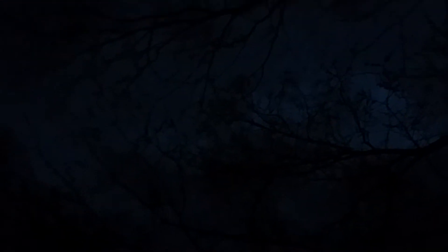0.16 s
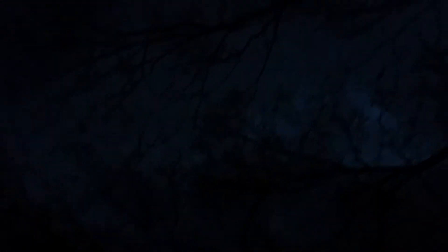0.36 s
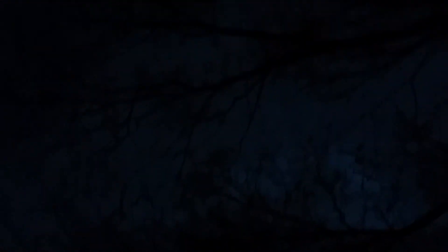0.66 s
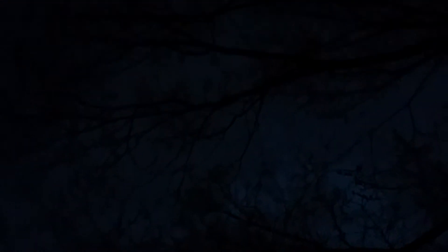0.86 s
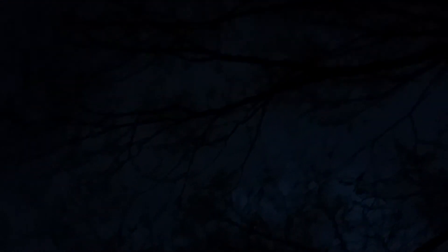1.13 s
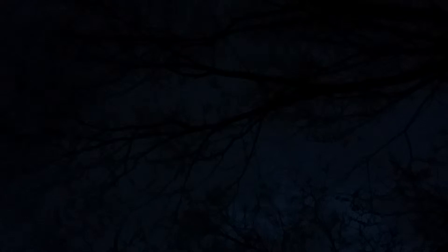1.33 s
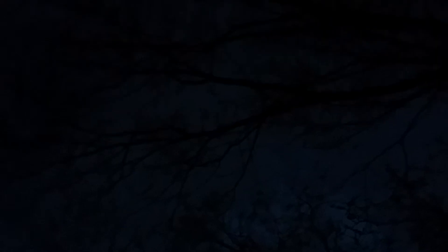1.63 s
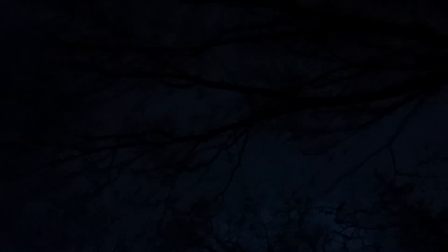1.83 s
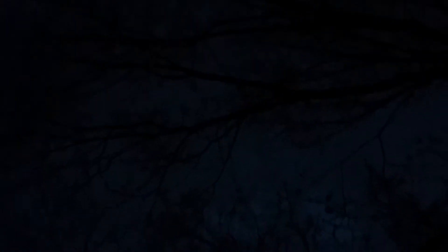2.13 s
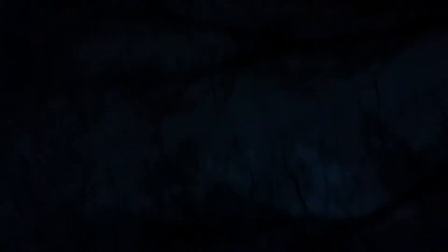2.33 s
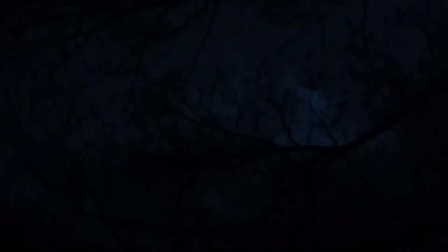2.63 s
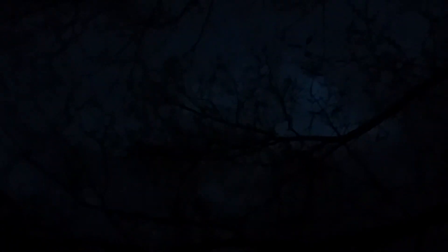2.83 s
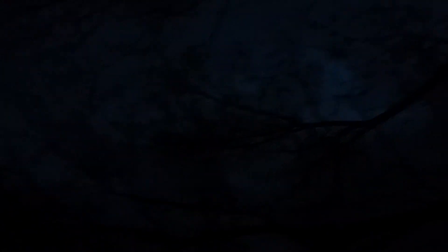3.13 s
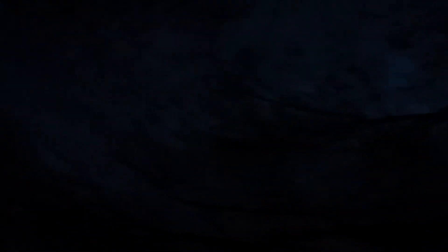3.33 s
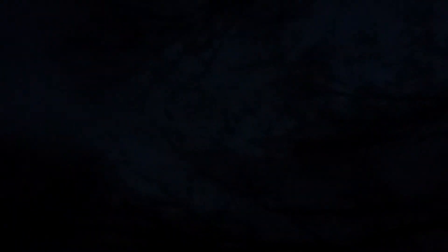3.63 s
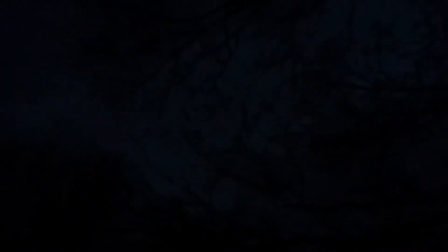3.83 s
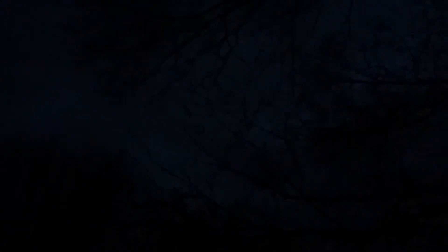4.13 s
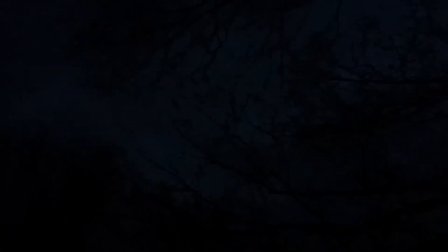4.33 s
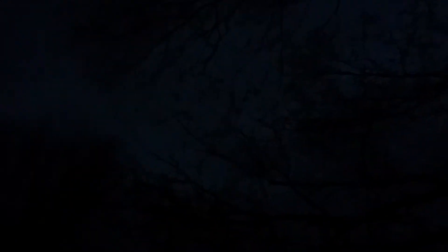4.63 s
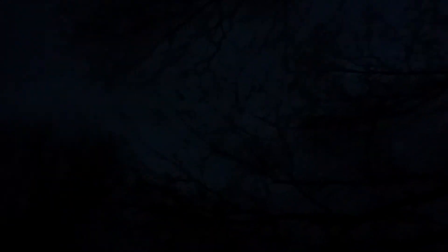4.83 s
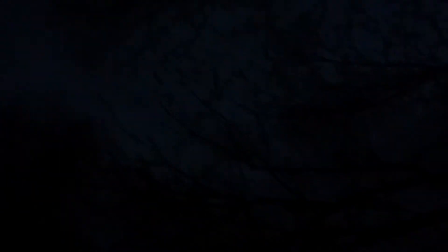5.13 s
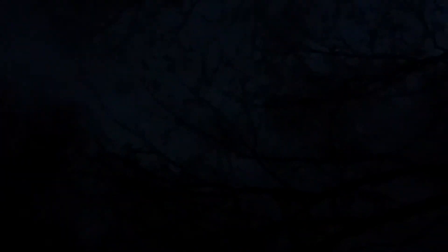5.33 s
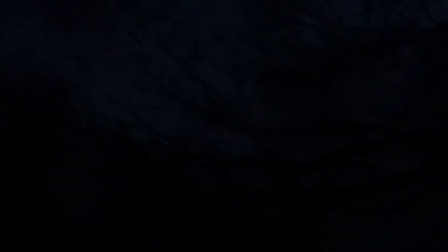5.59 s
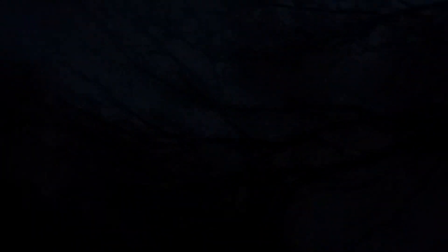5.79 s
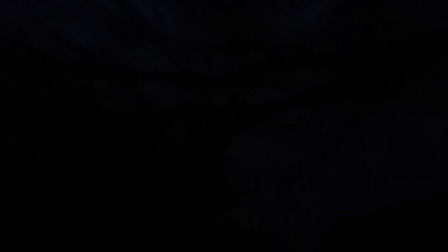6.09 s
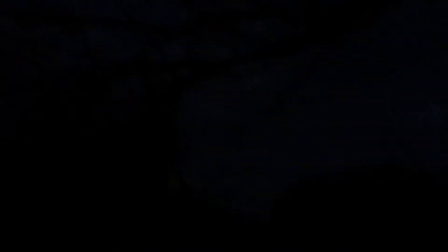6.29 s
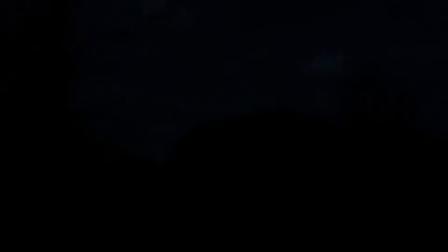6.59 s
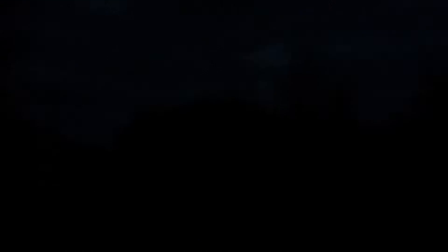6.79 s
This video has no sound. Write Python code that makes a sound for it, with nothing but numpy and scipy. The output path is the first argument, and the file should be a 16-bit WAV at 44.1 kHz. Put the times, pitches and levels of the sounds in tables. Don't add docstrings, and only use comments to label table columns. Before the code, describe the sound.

Hundreds of small frogs at a pond in bare woods at dusk fill the air with short, rising, near-pure whistles. Nearer peeps stand out of a blurred far chorus, mostly left. A slower frog gives dry ticks in runs, with soft clucks. Distant traffic rumbles faintly with a wavering engine hum. In the last two seconds, fingers click, knock and rub the hand-held stereo recorder as it turns.

```python
import sys
import numpy as np
from scipy import signal
from scipy.io import wavfile
from scipy.ndimage import uniform_filter1d

SR = 44100
rng = np.random.default_rng(int(sys.argv[2]) if len(sys.argv) > 2 else 0)


def store_wav(level_fs):
    pcm = np.round(np.clip(np.atleast_2d(level_fs), -1, 1) * 32767)
    wavfile.write(sys.argv[1], SR, pcm.T.astype(np.int16))


def natural_amplitude(level_db):
    exponent = np.asarray(level_db, float) / 20
    return 10 ** exponent


N = 306495

# (frequency [Hz], density [dB])
AIR_COLOUR = [(120, 9), (250, -4.5), (700, 1.5), (1300, 1), (2200, -5), (3700, -18.5), (4300, -12.5),
              (5200, -16.5), (6700, -13), (8500, -16), (10200, -17.5), (11500, -14), (13000, -19),
              (15300, -17)]
# (time [s], level [dB])
WASH_LEVEL = [
    (0.0, -51.5),
    (3.25, -51.5),
    (4.14, -54),
    (6.37, -52),
    (6.95, -52),
]
# (frequency [Hz], left-right likeness [-1 to 1])
STEREO_LIKENESS = [(60, 0.98), (150, 0.89), (380, 0.57), (620, 0.61), (1100, -0.46), (2380, 0.037),
                   (5980, -0.031), (15000, -0.013)]
# (frequency [Hz], left minus right [dB])
STEREO_LEAN = [(60, 0.5), (150, 0), (380, -0.5), (950, 2), (2380, 3.5), (5980, 9), (15000, 4)]
# (time [s], note [Hz], level [dB])
ENGINE = [
    (0.0, 136, -66),
    (.6, 140, -60),
    (1.12, 148, -49),
    (1.6, 140.4, -47),
    (2.24, 129, -66.5),
    (3.89, 140, -56),
    (6.2, 127, -60.5),
    (6.85, 128, -51),
    (6.95, 126, -76),
]
# (frequency [Hz], density [dB])
ROAR_COLOUR = [(18, -30), (30, -30), (44, -38), (66, 13.5), (107, 5.5), (141, 3.5), (153, -9), (172, 2),
               (260, -6.5), (340, -7.5), (570, -120)]
# (start [s], end [s], pitch [Hz], level [dB])
MACHINE_WHINE = (5.05, 5.75, 510, -66.5)
# (time [s], peak [dB], ring [Hz], left minus right [dB])
NAIL_CLICKS = [(0.179, -35, 8700, -3), (0.9254, -40, 11800, 11), (2.3281, -42, 8600, -7),
               (2.3764, -41, 8550, 1), (2.4644, -37.5, 8240, 1), (2.6477, -38, 6780, 6),
               (4.989, -38.5, 8600, -23.5), (5.0962, -41, 8280, -0.5), (5.218, -38, 8900, -11),
               (5.232, -40.5, 7860, -23), (5.362, -39.5, 6190, 3), (5.434, -36.5, 8900, -3),
               (5.469, -38, 8140, -6), (5.4879, -39, 7110, 0), (5.4984, -39, 9060, -10),
               (5.5212, -37, 8100, 2.5), (5.6045, -40, 6820, 17), (5.744, -47, 6960, -4),
               (5.7961, -24.5, 6960, 22), (5.808, -31.5, 8800, -14.5), (6.085, -40, 11200, -1),
               (6.229, -40, 6300, -7), (6.4613, -33, 7960, 1), (6.677, -33.5, 6580, 11),
               (6.718, -38, 7940, -16), (6.7366, -42, 6700, -3), (6.88, -43, 7350, -11.5)]
# (time [s], peak [dB], ring [Hz], left minus right [dB])
CASE_KNOCKS = [
    (5.452, -35.5, 470, -5.5),
    (5.497, -38, 305, -11.5),
    (5.522, -39, 1290, -8),
    (5.607, -43, 265, -19),
    (5.797, -30.5, 437, -11),
    (5.89, -40.5, 408, 9),
    (6.462, -38, 1530, 13.5),
    (6.679, -40, 556, 11.5),
    (6.83, -40.5, 226, -2),
    (6.87, -33.5, 716, -14.5),
]
# (middle [s], length [s], level [dB])
SKIN_STROKES = [
    (5.258, .1, -57),
    (5.774, 0.079, -47),
    (5.86, .14, -59),
    (6.057, 0.2, -58),
    (6.486, 0.18, -56),
    (6.66, 0.56, -62),
    (6.88, 0.14, -58),
]
# (time [s], peak [dB])
SINGLE_TICKS = [(.0488, -36), (.1067, -42), (.2314, -46), (.7512, -51), (2.0004, -49), (2.9572, -44),
                (3.0255, -45), (3.0644, -38), (3.6686, -45), (4.1924, -46), (4.7326, -49), (4.8968, -46)]
# (first tick [s], last tick [s], ticks [count], peak [dB], slowing [share of the run,
# negative quickens])
TICK_RUNS = [
    (.9178, 1.3987, 6, -40, .01),
    (1.5743, 1.8292, 3, -40.5, .08),
    (2.0517, 2.4359, 4, -46.5, -.12),
    (3.1208, 3.6112, 6, -39, 0),
    (3.7978, 4.1555, 5, -40.5, 0),
    (5.0604, 5.609, 6, -38, .11),
]
# (time [s], peak [dB], pitch [Hz])
LOW_CLUCKS = [
    (1.6217, -53, 1430),
    (1.782, -47.5, 1230),
    (1.909, -49, 1374),
    (2.0647, -59, 1383),
    (2.231, -54, 1276),
    (5.51, -50, 1064),
    (6.75, -52, 1334),
    (6.82, -51, 1315),
    (6.9, -51, 1350),
]
# (time [s], level [dB])
CHORUS_LEVEL = [(0.0, -29.5), (.07, -38.5), (.4, -39.5), (1.57, -39), (1.95, -36.5), (2.4, -39),
                (3.12, -39), (4.08, -38.5), (4.68, -39), (5.46, -38.5), (5.7, -41), (6.95, -40)]
# (middle pitch [Hz], level [dB])
CROWD_VOICES = [(2400, -30), (2520, -12), (2650, -2.5), (2800, 0), (2950, -2.5), (3100, -11), (3200, -18)]
# (ring [Hz], level [dB])
FAR_TICKERS = [(2860, -7), (3000, -5), (3090, -3), (3170, -2), (3260, -3), (3340, -5), (3420, -10),
               (3500, -14)]
# (start [Hz], end [Hz], length [s], lag at the left microphone [samples], upper partial [dB])
NEAR_VOICES = [(2420, 2865, .24, 15, -42), (2760, 3220, .185, 10, -36), (2570, 3030, .225, 8, -39),
               (2465, 2980, .2, 15, -38), (2640, 3070, .165, 8, -33), (2585, 3015, .185, 16, -38),
               (2720, 2985, .14, 17, -35), (2345, 2490, .08, 14, -39), (2650, 3150, .18, 15, -38),
               (2465, 2940, .2, 8, -40), (2710, 2990, .12, 10, -34), (2735, 3140, .15, 2, -40)]
# (time [s], level [dB])
NEAR_CALLS = [
    [(.942, -35), (2.24, -34), (3.99, -33.5), (5.255, -33.5), (6.59, -37)],
    [(.575, -38), (1.725, -35.5), (2.945, -34.5), (4.118, -37), (5.22, -37), (6.56, -37.5)],
    [(.1, -36), (1.428, -41), (2.659, -33.5), (3.856, -37.5)],
    [(1.18, -40), (2.485, -36.5), (3.69, -38.5)],
    [(.682, -44), (2.02, -33), (4.35, -36), (4.97, -43.5), (5.49, -39)],
    [(.586, -36.5), (2.251, -39), (4.714, -38), (6.143, -47)],
    [(1.813, -46.5), (4.555, -37), (6.001, -40), (6.186, -43)],
    [(.045, -48), (1.2, -48.5), (1.625, -44), (2.66, -51), (2.868, -48), (4.085, -46), (4.145, -47),
     (4.95, -53), (5.478, -48), (6.455, -51), (6.89, -42)],
    [(3.012, -38), (3.276, -45)],
    [(4.915, -41)],
    [(.495, -35.5), (2.06, -47)],
    [(6.867, -36.5)],
]
# (time [s], length [s], start [Hz], level [dB], left lag [samples])
HIDDEN_CALLS = [(.01, .14, 2850, -46, 20), (.065, .08, 2670, -46, 19), (.289, .08, 2750, -47, 25),
                (.38, .11, 2510, -47, 17), (.514, .08, 2620, -44, 14), (.79, .06, 2960, -47, 17),
                (.828, .22, 2550, -43, 26), (.843, .22, 2680, -45, 17), (1.207, .18, 2480, -46, 23),
                (1.71, .12, 2520, -43, 14), (1.881, .11, 2690, -45, 14), (2.0, .09, 2540, -46, 13),
                (2.03, .18, 2560, -47, 15), (2.305, .11, 2870, -47, 13), (2.38, .11, 2560, -46, 15),
                (2.739, .14, 2630, -46, 12), (2.744, .08, 2500, -49, 14), (3.053, .14, 2650, -45, 25),
                (3.278, .08, 2880, -47, 24), (3.288, .18, 3000, -53, 23), (3.3, .2, 2490, -41, 16),
                (3.39, .2, 2450, -45, 20)]
# (time [s], length [s], start [Hz], level [dB], left lag [samples])
LATE_HIDDEN_CALLS = [(3.472, .08, 2720, -45, 23), (3.761, .18, 2540, -46, 21), (4.081, .08, 2810, -45, 24),
                     (4.161, .22, 2620, -44, 14), (4.435, .18, 2630, -45, 22), (4.46, .08, 2820, -44, 15),
                     (4.739, .18, 2570, -44, 23), (5.059, .11, 2960, -46, 23), (5.258, .14, 2700, -45, 20),
                     (5.515, .17, 2520, -41.5, 21), (5.652, .08, 2880, -47, 23),
                     (5.677, .18, 2520, -48, 21), (5.767, .08, 2480, -51, 23), (5.877, .08, 2670, -47, 23),
                     (6.03, .16, 2470, -44, 18), (6.161, .08, 2760, -43, 23), (6.28, .17, 2420, -50, 18),
                     (6.371, .08, 2790, -50, 22), (6.455, .08, 2810, -49, 11), (6.725, .11, 2490, -51, 21),
                     (6.775, .11, 2470, -51, 20)]
# (time [s], left minus right for the pond [dB], added left lag [samples])
HAND_TURN = [
    (0.0, 6.0, 0),
    (2.59, 4.5, -1),
    (2.77, 7.5, -1),
    (3.15, 7.3, -1),
    (3.28, 7.2, 7),
    (5.6, 5.8, 7),
    (5.96, 5.5, 5),
    (6.23, .3, 8),
    (6.55, 2.0, 11),
    (6.95, 4.0, 15),
]
# (frequency [Hz], margin [dB])
FAINT_MARGIN = [(1900, -12), (2250, -6), (2500, -40), (3300, -40), (3650, -1.5), (5300, -2.2), (6200, -6),
                (10200, -3.5), (11500, -5), (13000, -3), (14900, -3), (15500, 0)]


def evened(x):
    return x / np.sqrt(np.mean(x ** 2) + 1e-20)


def read(points, hz):
    f, value = np.transpose(points)
    return np.interp(np.log(hz + 1), np.log(f + 1), value)


def follow(rows):
    s, *columns = np.transpose(rows)
    return [np.interp(np.arange(N) / SR, s, column) for column in columns]


def add(mix, s, sound, pan_db, lag=0):
    for side, (sign, late) in enumerate(((1.0, lag), (-0.97, 0))):
        start = max(round(s * SR) + round(late), 0)
        part = mix[side, start:][:len(sound)]
        part += natural_amplitude(sign * pan_db / 2) * sound[:len(part)]


def noise(shape_db, patch_db):
    hz = np.fft.rfftfreq(2048, 1 / SR)
    a, b, c, d, patch = rng.standard_normal((N // 512 + 5, 1025, 5)).T
    patch = uniform_filter1d(patch, size=20, axis=0)
    patch = evened(uniform_filter1d(patch, size=6, axis=1))
    same = np.clip(read(STEREO_LIKENESS, hz), -1, 1)[:, None]
    lean = natural_amplitude(read(STEREO_LEAN, hz) / 2)[:, None]
    shared, own = a + 1j * b, c + 1j * d
    z = np.array([shared * lean, (same * shared + np.sqrt(1 - same ** 2) * own) / lean])
    z *= natural_amplitude(shape_db(hz)[:, None] + patch_db * patch)
    return evened(signal.istft(z, nperseg=2048, noverlap=1536)[1][:, :N])


def woods(x, t60):
    taps = rng.choice([-1., 1.], (2, 16000)) * (rng.random((2, 16000)) < .05)
    taps *= natural_amplitude(-60 * np.arange(16000) / SR / t60)
    return signal.oaconvolve(x, taps / np.linalg.norm(taps[0]), axes=1)[:, :N]


def ring(hz, t60, rise):
    t = np.arange(0, t60, 1 / SR)
    y = np.sin(2 * np.pi * hz * t) * natural_amplitude(-60 * t / t60) * (1 - np.exp(-t / rise))
    return y / abs(y).max()


def peep(length, start_hz, end_hz, wobble, upper_db):
    u = np.arange(0, length, 1 / SR) / length
    hz = start_hz + (end_hz - start_hz) * (1.3 * u - .3 * u ** 2 - .1 * u ** 6)
    phase = 2 * np.pi * np.cumsum(hz) / SR
    flutter = np.interp(u, np.linspace(0, 1, len(wobble)), wobble)
    growth = 3.2 if length > .23 else 0.3
    swell = (0.84 + growth * u) * np.clip(np.minimum(u / 0.098, (1 - u) / 0.22), 0, 1)
    upper = natural_amplitude(upper_db + 2.0 * flutter[::-1]) * np.sin(phase * 3 / 2)
    return evened(swell * natural_amplitude(1.5 * flutter)) * np.sqrt(2) * (np.sin(phase) + upper)


def air():
    hiss_db = -63
    wash_db = follow(WASH_LEVEL)[0]
    wash = noise(lambda f: read(AIR_COLOUR, f) - 60 * (f > 3000) - 60 * (f < 90), .8)
    hiss = noise(lambda f: read(AIR_COLOUR, f) - 60 * (f <= 3000) - 40 * (f > 15600), 1.5)
    return natural_amplitude(wash_db + 3.0) * wash + natural_amplitude(hiss_db + 5.0) * hiss


def traffic():
    roar_db, roar_share = -53.5, 0.098
    hz, note_db = follow(ENGINE)
    note = np.sqrt(2) * natural_amplitude(note_db - 4.0) * np.sin(2 * np.pi * np.cumsum(hz) / SR)
    roar = noise(lambda f: read(ROAR_COLOUR, f), 0.94)
    return natural_amplitude(roar_db + roar_share * (note_db - note_db.mean())) * roar + note


def whine():
    start, end, hz, db = MACHINE_WHINE
    t = np.arange(N) / SR
    fade = np.clip(np.minimum(t - start, end - t) / 0.046, 0, 1)
    pulse_db = 2.5 * np.cos(2 * np.pi * (t - start - .05) / .55)
    return np.sqrt(2) * natural_amplitude(db + pulse_db) * fade * np.sin(2 * np.pi * hz * t)


def nail_clicks():
    out, t = np.zeros((2, N)), np.arange(220) / SR
    grit = signal.lfilter([1, 0, -1], 1, rng.standard_normal((2, len(NAIL_CLICKS), 220))) / 3
    burst = (t / 0.00069) ** 2 * np.exp(2 - 2 * t / 0.00053)
    for (s, db, hz, pan_db), first, second in zip(NAIL_CLICKS, *grit):
        ringing = 0.71 * np.sin(2 * np.pi * hz * t)
        add(out, s, natural_amplitude(db) * burst * (first + ringing), pan_db - 5.5, lag=8.6)
        add(out, s + 0.00056, natural_amplitude(db - 8.0) * burst * second, pan_db - 28.0, lag=-17.5)
    return out


def case_knocks():
    out = np.zeros((2, N))
    # (ratio to the ring, level [dB], decay to -60 dB [s])
    modes = ((.6, -23, 0.034), (1, 2, 0.023), (1.45, 1, 0.014),
             (2.2, -3.5, 0.011), (2.75, -12, 0.0073), (3.3, -14.5, 0.042))
    for s, db, hz, pan_db in CASE_KNOCKS:
        for ratio, mode_db, t60 in modes:
            mode = ring(ratio * hz, t60 * min(1, 500 / hz) ** 2.1, 0.3 / hz)
            add(out, s, -natural_amplitude(db + mode_db) * mode, pan_db, lag=35.5)
    return out


def skin_rub():
    t, strokes = np.arange(N) / SR, np.zeros(N)
    for s, length, db in SKIN_STROKES:
        strokes += natural_amplitude(db) * np.clip(1 - abs(t - s) / length * 2, 0, 1)
    rub = noise(lambda f: -18 * abs(np.log2(f / 8200 + 1e-9)), 3.0)
    return strokes * natural_amplitude(np.array([[-5], [1.5]])) * rub


def other_frogs():
    out, ticks = np.zeros((2, N)), list(SINGLE_TICKS)
    for first, last, count, db, slowing in TICK_RUNS:
        u = np.arange(count) / (count - 1)
        times = first + (last - first) * (u + slowing * (u * u - u))
        ticks += zip(times, db - 8 * abs(u - 0.9))
    for s, db in ticks:
        throat = ring(3390, .016, .0016) + .7 * ring(3190, .016, .0016)
        add(out, s, natural_amplitude(db - 1.0) * throat, 11.5, lag=15)
    for s, db, hz in LOW_CLUCKS:
        add(out, s, natural_amplitude(db) * ring(hz, 0.085, 0.0087), 3.0, lag=4.03)
    return out + natural_amplitude(-9) * woods(out, .3)


def far_tickers():
    beats = rng.random((len(FAR_TICKERS), N)) < 70 / SR
    beats = beats * natural_amplitude(5.0 * rng.standard_normal(N))
    rattle = np.zeros(N)
    for beat, (hz, db) in zip(beats, FAR_TICKERS):
        rattle += signal.oaconvolve(beat, natural_amplitude(db) * ring(hz, .011, .0012))[:N]
    return evened(np.array([rattle, .7 * np.roll(rattle, -19)]))


def far_frogs(count=680):
    out = np.zeros((2, N))
    draw, chance = rng.random((count, 4)), rng.standard_normal((count, 12))
    for k, ((when, pitch, size, climb), c) in enumerate(zip(draw, chance)):
        hz, length = 2400 + 800 * pitch, .1 + .09 * size
        half_climb = length * (800 + 500 * climb)
        whistle = peep(length, hz - half_climb, hz + half_climb, c[3:], -31.5)
        level = natural_amplitude(read(CROWD_VOICES, hz) + 0.43 * c[0])
        s = (k + 8 * when) / count * N / SR - .15
        add(out, s, level * whistle, 3.0 * c[1], lag=20 + 8 * c[2])
    mass = evened(out) + natural_amplitude(-11.5) * far_tickers()
    heard = evened(mass + natural_amplitude(6.5) * woods(mass, .6))
    return natural_amplitude(follow(CHORUS_LEVEL)[0] - 1.04) * heard


def near_frogs():
    climb = 2100
    turn_lag = follow(HAND_TURN)[1]
    rows = []
    for (start_hz, end_hz, length, lag, upper_db), calls in zip(NEAR_VOICES, NEAR_CALLS):
        for s, db in calls:
            rows.append((s, length, start_hz, end_hz, db, lag + turn_lag[round(s * SR)], upper_db))
    for s, length, hz, db, lag in list(HIDDEN_CALLS) + list(LATE_HIDDEN_CALLS):
        rows.append((s, length, hz, hz + climb * length, db, lag, -41))
    out, chance = np.zeros((2, N)), rng.standard_normal((len(rows), 14))
    for (s, length, start_hz, end_hz, db, lag, upper_db), c in zip(rows, chance):
        whistle = peep(length, start_hz, end_hz, c[1:], upper_db + 1.5 * c[0])
        add(out, s, natural_amplitude(db - 1.2) * whistle, 0, lag)
    return out + natural_amplitude(-10) * woods(out, .5)


def scene():
    background = air() + traffic() + whine()
    handling = nail_clicks() + case_knocks() + skin_rub()
    turn_db = follow(HAND_TURN)[0] - .6
    pond = (far_frogs() + near_frogs()) * natural_amplitude(np.array([turn_db, -turn_db]) / 2)
    return background + handling + other_frogs() + pond


def top_cut(x):
    return signal.sosfilt(signal.butter(12, 16830, fs=SR, output="sos"), x)


def record(dry):
    hz, _, z = signal.stft(dry, SR, nperseg=1024)
    power = uniform_filter1d((abs(z) ** 2).mean(0), size=7, axis=0)
    band_db = 10 * np.log10(uniform_filter1d(power, size=3, axis=1) + 1e-20)
    usual_db = np.median(band_db, axis=1, keepdims=True)
    kept = band_db > usual_db + read(FAINT_MARGIN, hz)[:, None]
    z = z * np.maximum(kept, .003) * ((hz > 40) & (hz < 15830))[:, None]
    mix = signal.istft(z, SR, nperseg=1024)[1][:, :N] - .0005
    return top_cut(mix)


dry = scene()
out = record(dry)
store_wav(out)
```